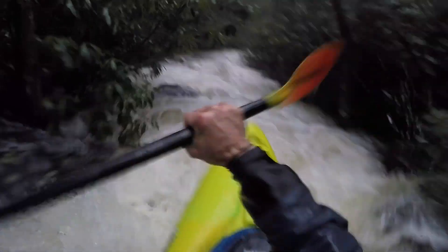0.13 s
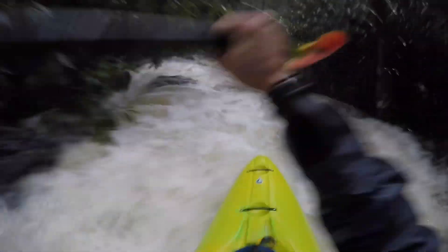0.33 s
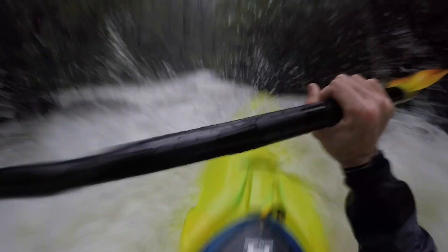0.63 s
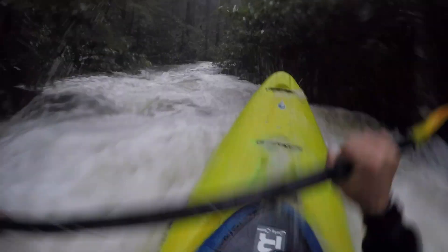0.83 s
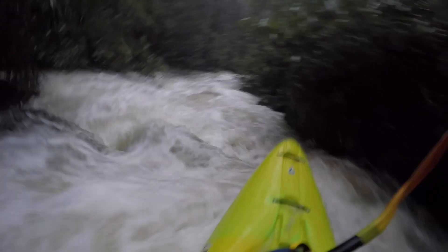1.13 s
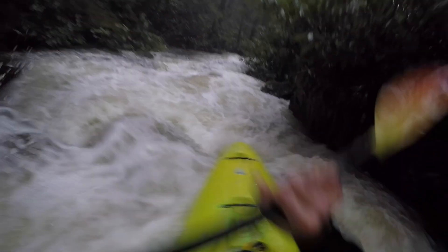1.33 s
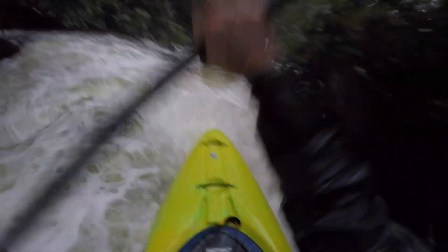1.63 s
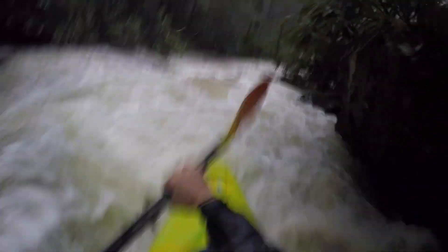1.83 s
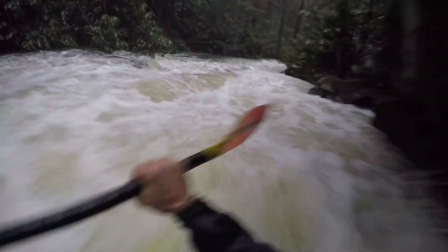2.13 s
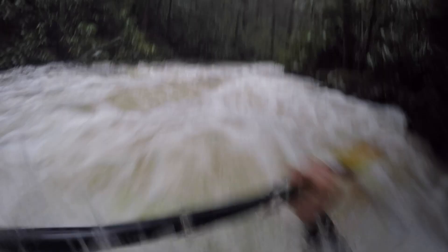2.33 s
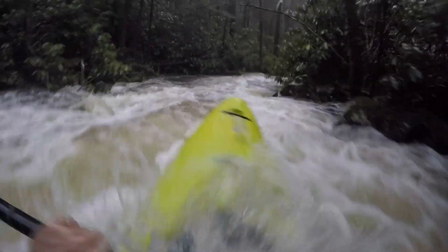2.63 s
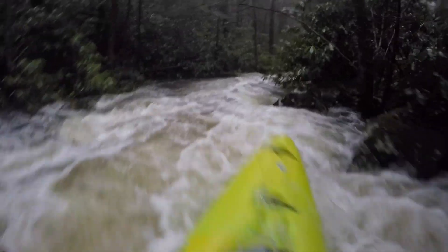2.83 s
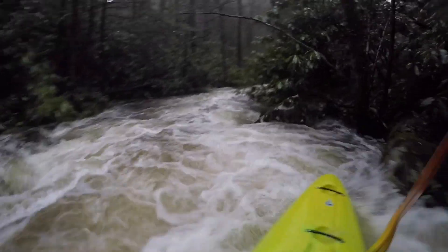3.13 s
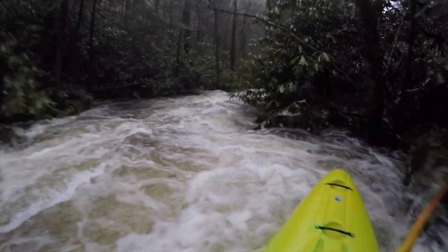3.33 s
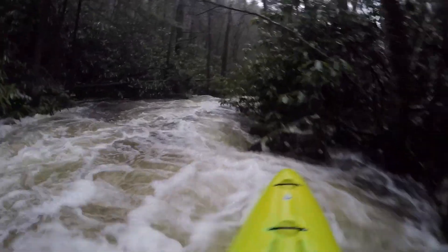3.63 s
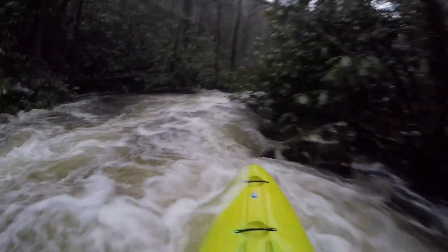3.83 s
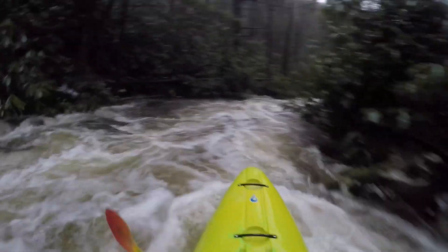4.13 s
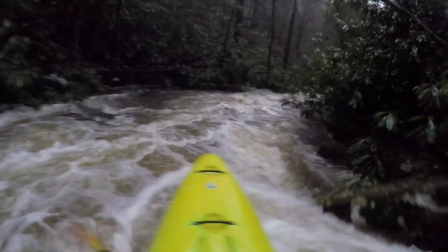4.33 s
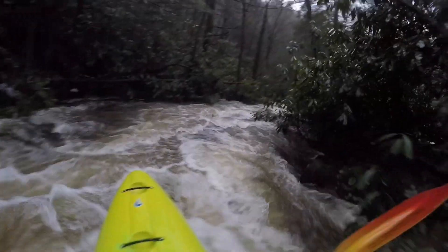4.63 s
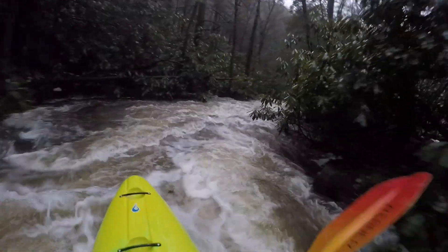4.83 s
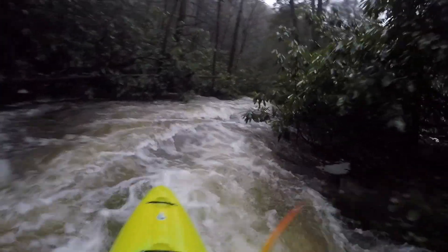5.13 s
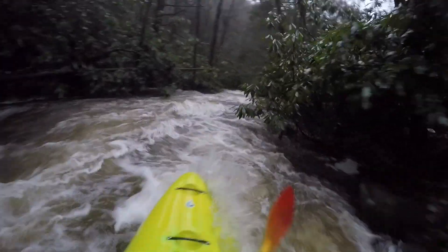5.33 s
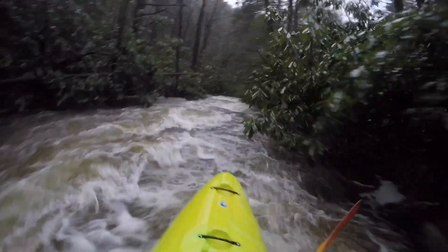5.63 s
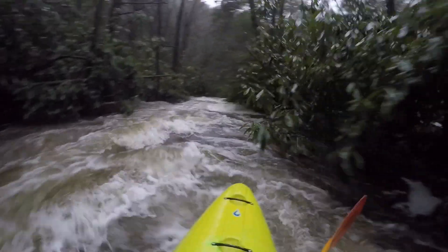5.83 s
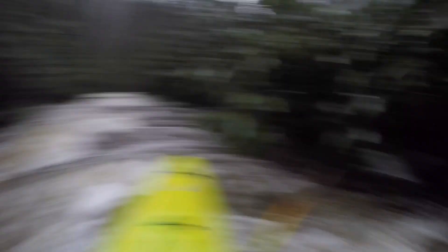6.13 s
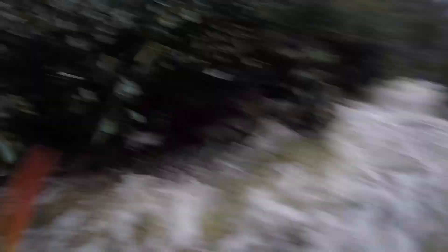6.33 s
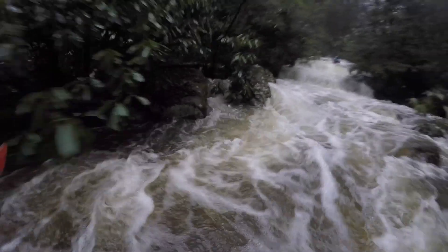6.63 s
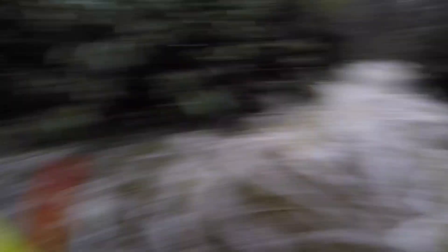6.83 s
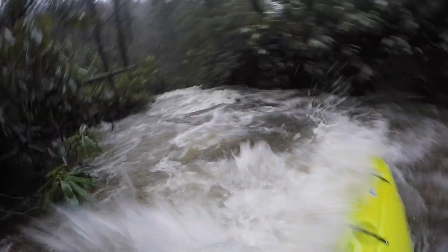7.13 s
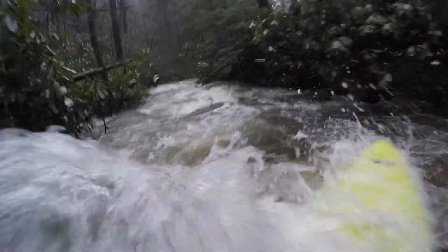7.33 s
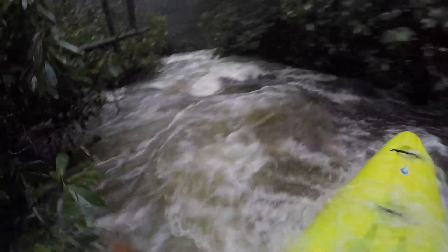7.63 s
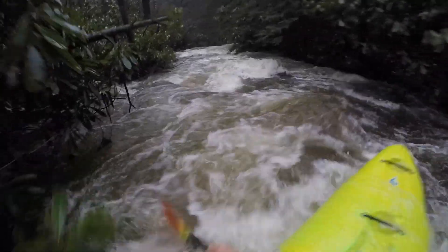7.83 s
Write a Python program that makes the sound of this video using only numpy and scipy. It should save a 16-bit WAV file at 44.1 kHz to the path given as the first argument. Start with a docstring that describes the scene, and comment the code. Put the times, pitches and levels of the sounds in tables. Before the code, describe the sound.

A dense whitewater roar runs throughout, close and resonant, as heard through a waterproof camera case on a kayaker. Bubbly mid-range rush mixes with fizzing spray and low churning. Around 0.4 to 0.6 seconds the boat plunges: several deep thumps, heavy low buffeting and splashes arrive together, and the roar swells. It eases by 1.4, then builds from 1.9, with wet bursts at 2.2 and a hard thump and splash at 2.4. A lighter knock and spray come at 2.8. From 3 to 6 seconds the water is quieter and steadier, dotted with short ringing ticks and crisp cracks of drops on the case, especially near 3.1, 4.4 to 4.6 and 4.9. A soft low bump comes at 6.3. At 7.0 a sharp slap and splash stand out, a smaller knock follows at 7.4, and light splashes and brighter spray rise from 7.6 to the end.

```python
"""A rapid roars around a kayak, heard from a camera in a waterproof case on the paddler.
The roar is filtered noise with ringing bubbles, the spray a fizz of tiny grains and the churn a low gurgle,
and the resonances of the case colour roar and spray. Sheets of water splash over the bow, and flying drops
tick on the shell as short rings and cracks. Waves thump the hull as damped low swings,
and slow and quick low noise buffets the case as the boat plunges."""
import sys
import numpy as np
from scipy import signal
from scipy.fft import rfft, irfft, next_fast_len
from scipy.io import wavfile
from scipy.ndimage import uniform_filter1d

SR = 44100
rng = np.random.default_rng(int(sys.argv[2]) if len(sys.argv) > 2 else 0)


def wav_record(signal):
    """Record a signal, one row per channel, as 16-bit PCM in the file named by sys.argv[1]."""
    frames = np.transpose(np.atleast_2d(signal))
    bounded = np.clip(frames, -1, 1)
    # unit amplitude maps onto the largest positive 16-bit level
    quanta = np.round(bounded * 32767).astype(np.int16)
    wavfile.write(sys.argv[1], SR, quanta)


N = 351918

# Colour of flying water before the case acts on it. Each row: frequency in Hz, relative level in dB per Hz.
SPRAY_COLOUR = [(800, -10.5), (1600, -3), (3200, -4), (5000, -3), (7300, -3.5), (10500, -5), (13000, -13),
                (15500, -23)]
# Colour of water churned and pushed aside. Each row: frequency in Hz, relative level in dB per Hz.
CHURN_COLOUR = [(60, -11), (130, 5), (220, -0.5), (370, 0), (600, -6.5), (900, -18), (1500, -10.5),
                (4000, -55)]


def from_db(db):
    """Decibels to gain."""
    return 10 ** (np.asarray(db) / 20)


def rms_one(x):
    """Scale to unit power."""
    return x / np.sqrt(np.mean(x ** 2) + 1e-20)


def in_time(rows):
    """Each column of a curve, at every sample."""
    s, *columns = np.transpose(rows)
    return [np.interp(np.arange(N) / SR, s, column) for column in columns]


def swell(s, half_s):
    """A smooth rise and fall around a moment: 1 at the top, 0.38 at half_s to either side."""
    return (1 + ((np.arange(N) / SR - s) / half_s) ** 2) ** -1.4


def drift(corner_hz):
    """Slow random wandering with spread 1: noise through two equal low-pass poles."""
    step = 40  # samples between the points of the slow noise
    warm_up = 2000
    r = np.exp(-2 * np.pi * corner_hz * step / SR)
    white = rng.standard_normal(N // step + 2 + warm_up)
    slow = signal.lfilter([1], [1, -2 * r, r * r], white)[warm_up:]
    return np.interp(np.arange(N) / step, np.arange(len(slow)), rms_one(slow))


def coloured(x, spectrum):
    """Give a steady sound a smooth spectrum."""
    hz, db = np.transpose(spectrum)
    size = next_fast_len(N)
    grid = np.maximum(np.fft.rfftfreq(size, 1 / SR), 1)
    gain = from_db(np.interp(np.log(grid), np.log(hz), db))
    return irfft(rfft(x, size) * gain, size)[:N]


def noise(spectrum):
    """Turbulent noise of a given colour, unit power."""
    return rms_one(coloured(rng.standard_normal(N), spectrum))


def resonate(x, hz, width_hz):
    """One resonance with gain 1 on top."""
    r = np.exp(-np.pi * width_hz / SR)
    numerator = np.array([1, 0, -1]) * (1 - r * r) / 2
    denominator = [1, -2 * r * np.cos(2 * np.pi * hz / SR), r * r]
    return signal.lfilter(numerator, denominator, x + 1e-18)


def case(x):
    """The shell and its trapped air boost or cut one band after another."""
    # Resonances of the case. Each row: frequency in Hz,
    # width in Hz before it narrows with a boost or widens with a cut, boost in dB.
    resonances = [(1346, 97, 3), (1653, 576, 9.5), (2370, 480, 4), (2796, 150, 3), (3910, 980, 5.5),
                  (4904, 1100, 6.5), (6470, 680, 2.5), (7700, 3400, -2), (9860, 6500, -5.5)]
    for hz, width_hz, boost_db in resonances:
        band = resonate(x, hz, width_hz / from_db(boost_db / 2))
        x = x + (from_db(boost_db) - 1) * band
    return x


def grains(per_s, spread_db, low_hz, high_hz, q, count=20):
    """Bubbles and droplets of random size and pitch, each a short ring set by q; unit power."""
    at = np.flatnonzero(rng.random(N) < per_s / SR)
    size_db = spread_db * np.minimum(rng.exponential(1, len(at)), 4.5)
    sizes = from_db(size_db) * rng.choice([-1, 1], len(at))
    pitch = rng.integers(0, count, len(at))
    out = np.zeros(N)
    for k, hz in enumerate(np.geomspace(low_hz, min(high_hz, SR / 2), count)):
        clicks = np.zeros(N)
        clicks[at] = sizes * (pitch == k)
        out += resonate(clicks, hz, hz / q)
    return rms_one(out)


def add(out, s, sound):
    """Mix a short sound in at a time."""
    start = max(round(s * SR), 0)
    out[start:start + len(sound)] += sound[:N - start]


def buffeting(flow_db):
    """Eddies press on the case, in slow heaves and quicker flutter: more in fast water, most in a plunge."""
    # Colours of the eddies. Each row: frequency in Hz, relative level in dB per Hz.
    heave_colour = [(8, 4), (16, 9), (28, 1.5), (48, -4), (62, -18.5), (120, -49)]
    flutter_colour = [(35, -21), (55, -6.5), (78, 1.5), (100, -7.5), (130, -25.5), (260, -26.5), (600, -55)]
    # The boat plunges over a wave. Each row: middle in seconds, slow heave in dB, quick flutter in dB,
    # half length in seconds.
    plunges = [(0.408, -21, -34, .035), (0.566, -22, -35, 0.11), (1.57, -29.5, -52, 0.15),
               (1.948, -21.5, -40, 0.14), (2.228, -30, -37, 0.053), (2.45, -33, -29, .06),
               (3.33, -36, -62, 0.18), (4.5, -34.5, -59, 0.041), (5.033, -38, -55, 0.074),
               (5.48, -43, -63, .05), (6.298, -33, -35.5, 0.076), (7.002, -31, -48.5, 0.17),
               (7.407, -35.5, -39.5, 0.088)]
    # level in dB at calm flow, and the dB gained for every dB that the flow rises above calm
    heave = from_db(-43 + 1.66 * flow_db)
    flutter = from_db(-51.5 + 1.54 * flow_db)
    for s, heave_db, flutter_db, half_s in plunges:
        plunge = swell(s, half_s)
        heave = np.hypot(heave, from_db(heave_db) * plunge)
        flutter = np.hypot(flutter, from_db(flutter_db) * plunge)
    out = np.zeros(N)
    for spectrum, gain in ((heave_colour, heave), (flutter_colour, flutter)):
        eddies = noise(spectrum)
        # eddies that follow each other are of much the same strength
        strength = np.sqrt(uniform_filter1d(eddies ** 2, size=SR // 7) + 0.034)
        out += gain * eddies / strength
    return out


def thumps(size=16000):
    """Hull and mount give under a blow and swing, damped by the water, which answers with a dull thud."""
    # Waves and knocks on the boat. Each row: start in seconds, envelope peak in dB before the mix,
    # swing in Hz, time to the peak in seconds.
    blows = [(0.376, -13, 73.3, 0.017), (0.416, -14.5, 29.8, 0.014), (0.509, -26, 148, 0.0094),
             (0.524, -12, 25.8, 0.045), (0.607, -34, 330, 0.0055), (.645, -31, 28.2, 0.016),
             (2.026, -27.5, 340, 0.0036), (2.215, -17, 24, 0.013), (2.429, -17.5, 250, 0.0014),
             (2.432, -15, 91.5, 0.012), (2.851, -21.5, 335, 0.002), (3.448, -28.5, 350, 0.0016),
             (4.963, -31, 887, 0.0029), (6.29, -30, 94.5, 0.02), (7.424, -30, 870, 0.0016)]
    thud_db = -10.5  # rush of water pushed aside, relative to the swing of the quickest blows
    swings, push, t = np.zeros(N), np.zeros(N), np.arange(size) / SR
    for s, peak_db, hz, swell_s in blows:
        envelope = from_db(peak_db) * t / swell_s * np.exp(1 - t / swell_s)
        add(swings, s, envelope * np.sin(2 * np.pi * hz * t))
        # the quicker the blow, the more thud
        add(push, s, envelope * min(1, 0.0024 / swell_s) ** 1.2)
    return swings + from_db(thud_db) * push * noise(CHURN_COLOUR)


def droplets(count=40):
    """Faint, soft drops at random moments, as rows like those of the larger drops."""
    per_s, mean_hz, spread_octaves = 2.5, 2380, 0.1
    ring_db, spread_db, crack_db = -36, 2, -44  # before the gains of the drops
    times = np.cumsum(rng.exponential(1 / per_s, count))
    rows = []
    for s, (weight, place) in zip(times, rng.standard_normal((count, 2))):
        hz = mean_hz * 2 ** (spread_octaves * place)
        rows.append((s, ring_db + spread_db * weight, hz, crack_db, 0))
    return rows


def drops(rows, ring_width_hz, body_db, mode_scatter_db, splat_db, splat_s,
          ring_gain_db, crack_gain_db, size=1500):
    """A drop slaps the shell and spreads: a ring in the case, and a crack of stiff modes that varies by spot."""
    # Stiff modes of the shell that a sharp slap wakes. Each row: frequency in Hz, width in Hz,
    # level in dB before scatter and tilt.
    shell_modes = [(3240, 240, -3), (4320, 960, 3.5), (5340, 680, 7.5), (6000, 760, -4), (7900, 980, -5),
                   (10500, 870, -9), (13400, 1500, -13)]
    out, t = np.zeros(N), np.arange(size) / SR
    three_ms = np.sqrt(0.003 * SR / size)  # turns power over the whole tick into power over 3 ms
    scatters = rng.standard_normal((len(rows), size))
    spots = rng.standard_normal((len(rows), len(shell_modes)))
    lags = (rng.uniform(0.0005, 0.0012, len(rows)) * SR).astype(int)
    for (s, ring_db, hz, crack_db, tilt_db), scatter, spot, lag in zip(rows, scatters, spots, lags):
        if s * SR >= N - 1:
            continue
        slap = (t == 0) + from_db(splat_db) * scatter * np.exp(-t / splat_s)
        # the shock returns from the far side of the shell and cuts notches
        shock = slap - 0.36 * np.roll(slap, lag)
        # soft drops give a pure, longer blip; hard ones shake the whole case
        hardness = from_db(0.42 * np.clip(crack_db - ring_db + 9.5, -16, 8))
        blip = resonate(resonate(slap, hz, ring_width_hz * hardness), hz, 1800)
        body = resonate(resonate(slap, 1860, 1500), 1760, 1800)
        ring = case(blip + from_db(body_db) * hardness * body)
        crack = np.zeros(size)
        for k, (mode_hz, mode_width_hz, mode_db) in enumerate(shell_modes):
            tilt = tilt_db * np.log2(mode_hz / 5000)
            gain = from_db(mode_db + mode_scatter_db * spot[k] + tilt)
            crack += (-1) ** k * gain * resonate(shock, mode_hz, mode_width_hz)
        tick = from_db(ring_db + ring_gain_db) * rms_one(ring)
        tick = tick + from_db(crack_db + crack_gain_db) * rms_one(crack)
        add(out, s, three_ms * tick)
    return out


def splashes():
    """A sheet of water folds air into a lumpy cloud of bubbles and tears into hissing mist."""
    # Sheets breaking over the bow. Each row: middle in seconds, bubble level in dB, mist level in dB
    # (both before the lumps), half length in seconds.
    sheets = [(0.367, -28.5, -32, 0.027), (0.502, -31, -36.5, 0.036), (0.612, -27.5, -40, .02),
              (1.94, -35, -35.5, 0.034), (2.196, -32, -33, 0.018), (2.399, -24, -35, 0.02),
              (2.444, -25.5, -41, 0.02), (2.80, -41, -39, 0.06), (6.96, -36.5, -46, 0.023),
              (7.017, -35, -42.5, 0.064), (7.625, -41, -41, 0.05), (7.793, -40.5, -41, 0.08)]
    cloud = rms_one(case(grains(1500, spread_db=0.5, low_hz=1400, high_hz=2460, q=11)))
    hiss = grains(7000, spread_db=3.0, low_hz=2560, high_hz=11900, q=6.5)
    mist = rms_one(case(coloured(hiss, SPRAY_COLOUR)))
    # a sheet of water tears unevenly
    lumps = rms_one(from_db(1.4 * drift(31)))
    out = np.zeros(N)
    for s, bubble_db, mist_db, half_s in sheets:
        out += (from_db(bubble_db) * cloud + from_db(mist_db) * mist) * swell(s, half_s)
    return lumps * out


def churn(level_db):
    """Big pockets of air gurgle under the boat."""
    gurgle = grains(260, spread_db=4.0, low_hz=178.7, high_hz=819, q=26)
    return from_db(level_db) * rms_one(noise(CHURN_COLOUR) + from_db(-10) * gurgle)


def spray(level_db):
    """Foam fizzes around the bow; the harder it breaks, the more droplets there are."""
    per_s = 9000 * from_db(level_db - np.max(level_db) + 6.5 + 2 * drift(20))
    fizz = grains(per_s, spread_db=3.0, low_hz=1950, high_hz=15300, q=2.4)
    fizz = fizz + 1.04 * rng.standard_normal(N)
    return from_db(level_db) * rms_one(case(coloured(fizz, SPRAY_COLOUR)))


def roar(level_db):
    """Countless far bubbles merge into a rush; nearer ones pop out of it in clumps."""
    # Colour of the rush before the case acts on it. Each row: frequency in Hz, relative level in dB per Hz.
    rush_colour = [(300, -16.5), (800, -8), (1100, -6), (1400, -3), (2300, 5), (3200, -5), (5000, -12),
                   (7000, -15.5), (10000, -18.5), (15000, -37)]
    near = grains(700 * from_db(3 * drift(7)), spread_db=3.5, low_hz=1254, high_hz=3040, q=8.5)
    far = rms_one(case(noise(rush_colour)))
    rush = far + from_db(-7.0) * rms_one(case(near))
    return from_db(level_db + 0.58 * drift(14.3)) * rms_one(rush)


def scene():
    """Water all around, drops on the case, blows and buffeting from below."""
    # The rapid around the boat. Each row: time in seconds, force of the flow as the level of its roar in dB,
    # level of the spray in dB, level of the churning in dB (all three before their trims).
    rapid = [(0.0, -33, -42, -46), (0.29, -32.5, -40, -47.5), (0.49, -29.5, -37, -42.5),
             (0.75, -31, -40, -47), (1.4, -35.5, -43, -50), (1.89, -35.5, -43, -46.5),
             (2.13, -31, -37, -43.5), (2.36, -30, -38, -45), (2.62, -33, -40, -49), (2.96, -35, -43, -50),
             (4.33, -38.5, -48, -53), (4.76, -38, -48, -53), (5.98, -37.5, -47, -56),
             (6.29, -37.5, -49, -54.5), (6.6, -37.5, -50, -58), (6.98, -36, -47, -52),
             (7.22, -38, -48, -53.5), (7.98, -36, -42, -54.5)]
    # The larger drops on the case. Each row: start in seconds, ring in dB over 3 ms, ring in Hz,
    # crack in dB over 3 ms, crack tilt in dB per octave (ring and crack before their gains).
    large_drops = [(0.0681, -26.5, 1400, -22.5, 0), (0.2032, -29, 2330, -39, -2),
                   (0.6123, -18.5, 2330, -34, -3), (0.8236, -26, 1340, -39, -2),
                   (1.2586, -28, 1400, -29, 4), (2.3182, -21, 1710, -23, 7), (2.3827, -26, 2250, -37, -2),
                   (2.4304, -17, 2930, -44, -2), (2.6373, -32, 3300, -32, -2), (2.8485, -27, 2820, -43, -2),
                   (2.8529, -20.5, 2340, -31.5, -4), (3.1072, -14.5, 1390, -38, 0),
                   (3.4771, -23.5, 1510, -34, -2), (3.6121, -29.5, 1400, -35, -1),
                   (3.6685, -24, 2520, -53, -2), (3.7153, -29.5, 2300, -55, -2),
                   (3.957, -30, 2520, -47, -2), (4.0704, -23.5, 1400, -38, -5),
                   (4.3891, -29, 1820, -28.5, -5), (4.4359, -17, 1750, -30.5, -1),
                   (4.5651, -26, 1350, -19.5, -1.5), (4.8637, -30.5, 1820, -38, -2),
                   (4.8992, -19.5, 1400, -25.5, -2), (4.9627, -19.5, 2590, -28, 1),
                   (5.106, -29.5, 1810, -31, -12), (5.2145, -24, 2650, -32, -7),
                   (5.2645, -27, 2460, -57, -2), (5.7198, -23.5, 2540, -32, 4),
                   (5.7238, -27.5, 1810, -34, -1), (6.1245, -30.5, 1400, -43, -2),
                   (6.3048, -31.5, 2280, -50, -2), (6.326, -26.5, 1800, -35, -4),
                   (6.7886, -23, 1760, -25, -6), (6.8478, -30.5, 2320, -45, 3),
                   (6.9864, -14, 2600, -15.5, 0), (6.9964, -28, 2230, -34, -1),
                   (7.1542, -31.5, 2770, -37, 7), (7.3747, -32, 2390, -52, -2), (7.387, -30, 2370, -53, -2),
                   (7.4246, -16.5, 2580, -31, 4), (7.789, -29, 2140, -39, -2)]
    flow_db, spray_db, churn_db = in_time(rapid)
    calm_db = -37
    water = roar(flow_db + 0.15) + spray(spray_db + 0.4) + churn(churn_db + 1.7) + splashes()
    ticks = drops(large_drops + droplets(), ring_width_hz=370, body_db=-15.5, mode_scatter_db=1.2,
                  splat_db=-26.5, splat_s=0.0025, ring_gain_db=2.0, crack_gain_db=-3.0)
    blows = from_db(-3.5) * thumps()
    return (water + ticks + blows + buffeting(flow_db - calm_db))[None]


def record(dry):
    """The recorder rounds the highest peaks and cuts the top steeply."""
    ceiling, cutoff_hz = 0.85, 15400
    rounded = dry / (1 + (dry / ceiling) ** 4) ** (1 / 4)
    steep_cut = signal.ellip(10, 0.1, 80, cutoff_hz, fs=SR, output="sos")
    return signal.sosfilt(steep_cut, rounded)


dry = scene()
out = record(dry)
wav_record(out)
```